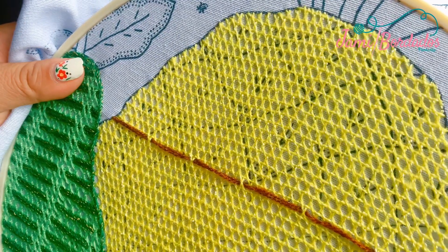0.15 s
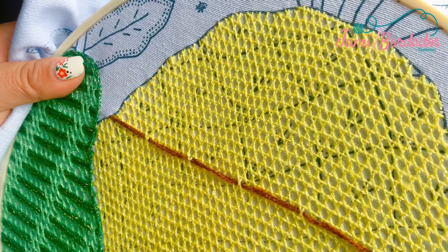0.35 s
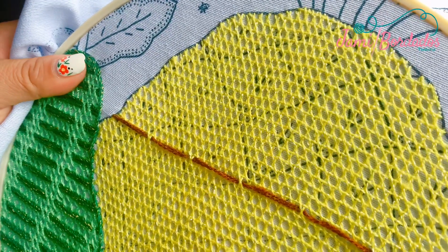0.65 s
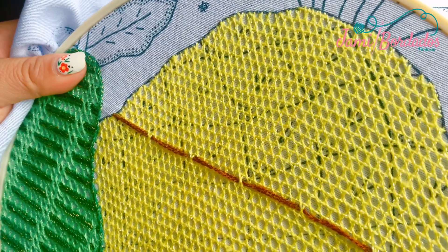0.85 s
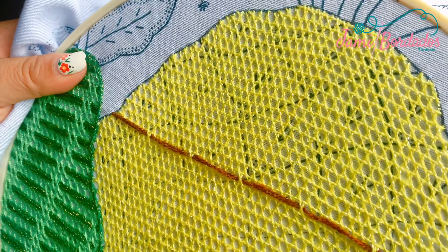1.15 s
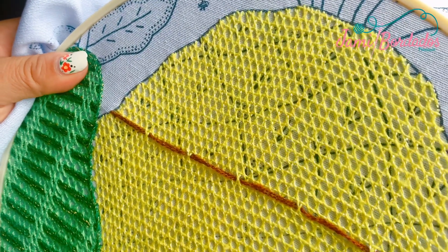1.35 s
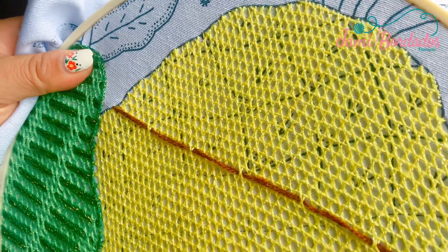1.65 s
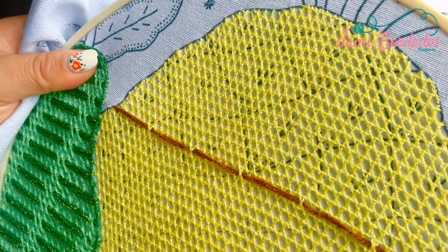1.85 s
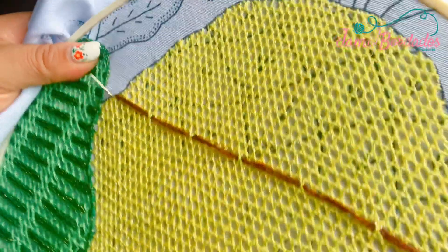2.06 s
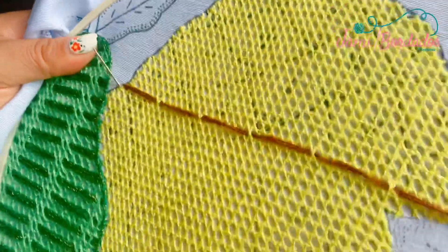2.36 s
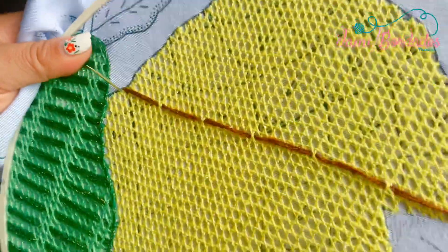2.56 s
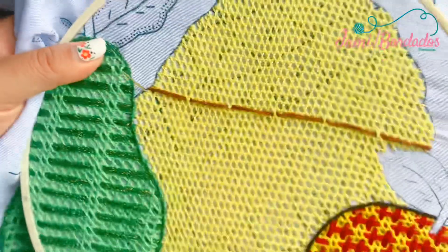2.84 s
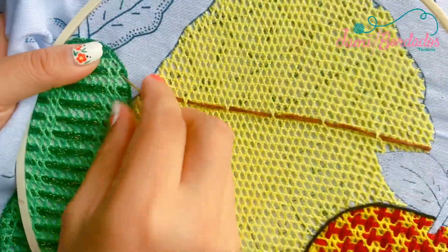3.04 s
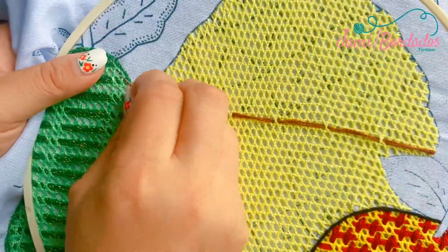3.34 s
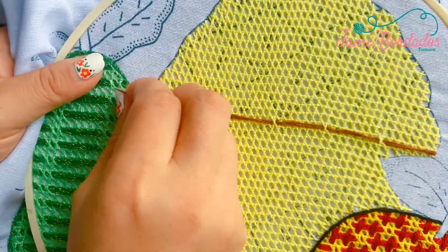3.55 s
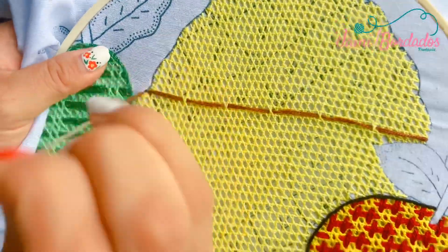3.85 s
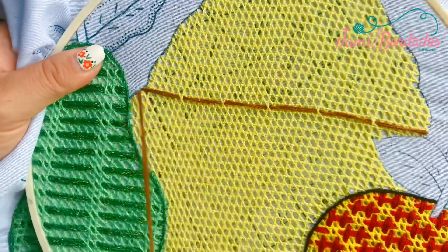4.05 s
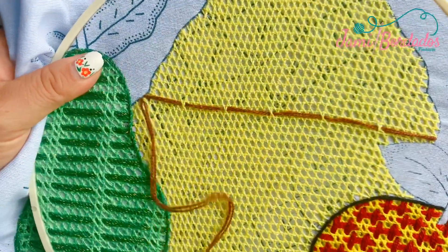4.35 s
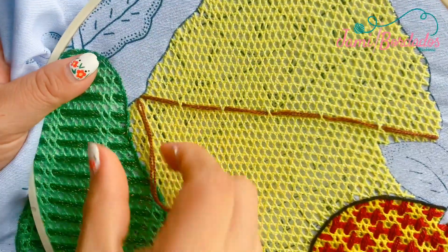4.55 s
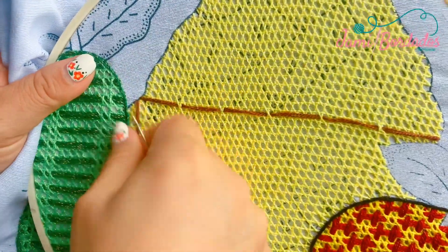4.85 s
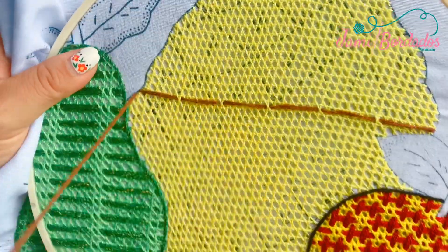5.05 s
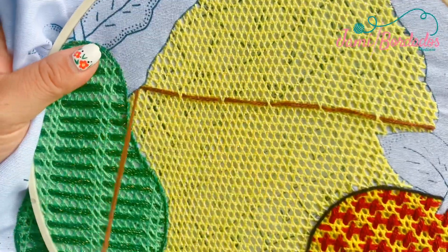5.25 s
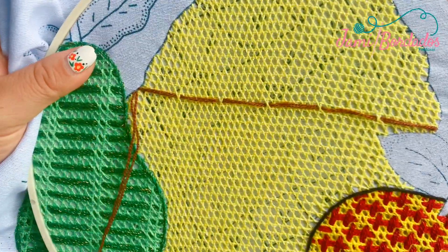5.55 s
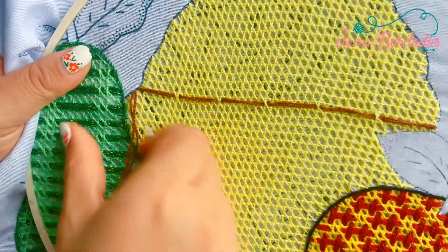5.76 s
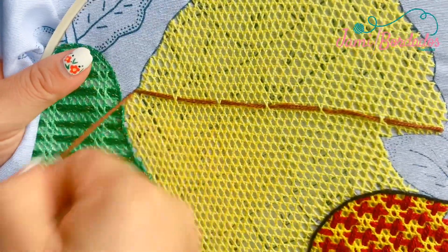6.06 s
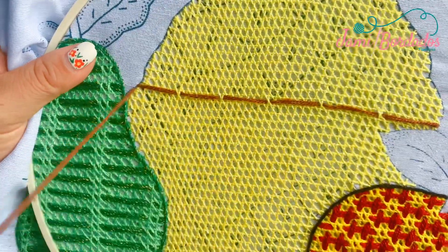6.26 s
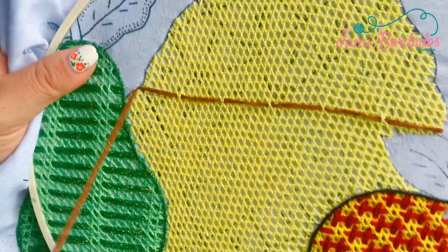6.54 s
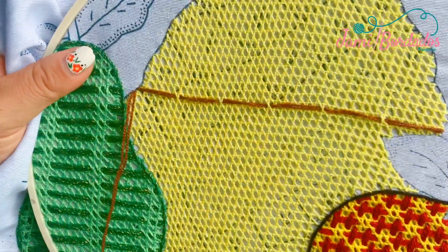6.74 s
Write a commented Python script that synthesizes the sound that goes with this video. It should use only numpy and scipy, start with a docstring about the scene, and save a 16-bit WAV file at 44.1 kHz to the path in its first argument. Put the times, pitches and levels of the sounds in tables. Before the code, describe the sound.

Close up indoors, hand embroidery: light taps, a short creak, brushing fingers, a sharp pop and rasping thread pulls above a low hum.

```python
"""Indoors, close to a two-port microphone, cloth stretched in a hoop is embroidered by hand over a motor's low
hum. The needle clicks, creaks through the weave, is gripped amid brushing fingers and pops free; then the
thread is drawn through in three rasping pulls, the last in two parts. Random impulses and noise model the
friction, and short blows the taps; they excite the resonances of cloth, thread and needle. Damped sines sway
the hoop, and steady sines over shaped noise make the hum and the rumble of the room."""
import sys
import numpy as np
from scipy import signal
from scipy.fft import rfft, irfft
from scipy.io import wavfile

SR = 44100
rng = np.random.default_rng(int(sys.argv[2]) if len(sys.argv) > 2 else 0)


def store_wav(level_fs):
    """Save 16-bit WAV to argv[1]."""
    pcm = np.round(np.clip(np.atleast_2d(level_fs), -1, 1) * 32767)
    wavfile.write(sys.argv[1], SR, pcm.T.astype(np.int16))


N = 304290
TIME = np.arange(N) / SR  # s
BINS = np.fft.rfftfreq(4096, 1 / SR)  # Hz

# Levels in the tables are relative: mixing gains, filters and the two ports act on them afterwards.

# Resonances of the stretched cloth. Each row: frequency in Hz, width in Hz, level in dB.
CLOTH_MODES = [(170, 23.6, 5), (298.4, 27, 6), (412.5, 70, 1.5), (670, 74, 1), (801, 62, -2),
               (957, 130, -1), (1206, 257, -2.5), (1563, 95, -5), (1836, 300, -8), (3125, 110, -9.5),
               (4600, 1000, -14)]
# Pulls of the thread. Each row: start in seconds, fastest moment in seconds, end in seconds,
# rasp of the cloth in dB, hiss of the fibres in dB, shaking of the hoop in dB,
# loss of speed at both ends in dB, rate of taking up in dB/s, rate of going slack in dB/s.
THREAD_PULLS = [(3.746, 4.082, 4.168, -31.5, -50.5, -44, 15.5, 238, 900),
                (4.915, 5.137, 5.264, -29.5, -50, -38.5, 8, 237.5, 476),
                (6.035, 6.075, 6.24, -41, -55.5, -37, 4.5, 177, 400),
                (6.276, 6.436, 6.474, -39.5, -55, -38, 2.5, 239, 2000)]
# Spectrum of the thread's hiss. Each row: frequency in Hz, density in dB per Hz.
THREAD_HISS_SPECTRUM = [(1500, 8), (3000, -4.5), (4000, 1.5), (5500, 8), (7300, 3.5), (8700, 4), (9350, 8),
                        (10000, 7), (11500, 1), (13500, -2.5), (16000, -2)]
# Resonances of the thread in its hole. Each row: mean frequency in Hz, width in Hz, level in dB.
THREAD_MODES = [(778, 160, -1.5), (1400, 310, 1.5), (1800, 390, -9), (3150, 310, -11)]
# Response of the hoop to the plucking thread. Each row: frequency in Hz, gain in dB.
HOOP_RESPONSE = [(40, -11.5), (80, -6.5), (115, 2), (165, 0.5), (230, -9.5), (320, -5.5), (430, -18),
                 (560, -15.5), (1200, -39)]
# Plucks and taps on the cloth. Each row: time in seconds, peak in dB, centre of the blow in Hz,
# decay time of the scrape in seconds.
CLOTH_TAPS = [(1.396, -52.5, 1300, .002), (1.509, -51.5, 1200, 0.004), (1.784, -50, 1600, 0.011),
              (1.9383, -40, 1700, 0.0019), (1.942, -33, 1600, 0.0028), (1.977, -23, 1860, 0.0012),
              (1.981, -29, 1400, 0.003), (2.001, -35.5, 1700, 0.003), (2.0795, -34, 1400, 0.00083),
              (2.15, -58, 1800, .002), (2.274, -29, 328, 0.0092), (2.435, -36.5, 1420, 0.0095),
              (2.48, -41, 1400, 0.0062), (2.548, -44, 900, .004), (2.594, -48, 1200, 0.0022),
              (2.635, -62, 1300, 0.0035), (2.7313, -28, 425, 0.0083), (2.745, -34, 312, 0.0091),
              (2.752, -40, 1000, .003), (2.829, -47, 1300, .002), (2.886, -40.5, 1500, 0.0024),
              (2.894, -39, 1500, 0.0029), (2.914, -42, 1400, 0.0028), (2.939, -40, 1300, 0.036),
              (2.973, -45, 1300, 0.0077), (3.019, -40, 1670, 0.019), (3.0874, -41, 1500, 0.0022),
              (3.621, -21, 1500, 0.00085), (3.65, -31, 1300, 0.0015), (3.708, -28.5, 700, 0.0027),
              (3.728, -20, 480, 0.0089), (3.7305, -9.5, 1330, 0.0028), (3.87, -28.5, 1100, .002),
              (3.9803, -19.5, 2100, 0.0027), (3.9925, -21, 1610, 0.00088), (4.0325, -25, 1400, .001),
              (4.056, -21.5, 1400, 0.0044), (4.071, -32, 920, 0.0041), (4.085, -21, 1100, 0.0019),
              (4.108, -23, 1000, 0.00091), (4.837, -40, 800, .005), (4.908, -27.5, 1200, .002),
              (4.938, -23, 784, 0.0072), (4.982, -28, 1290, .001), (5.173, -18.5, 1900, 0.001),
              (5.182, -15.5, 1260, 0.0018), (5.219, -20, 1600, 0.00083), (5.227, -20.5, 1700, .001),
              (5.273, -31, 1400, 0.00097), (5.303, -29, 1100, .001), (5.487, -36, 1500, 0.0054),
              (5.495, -42.5, 750, 0.013), (5.537, -49, 1400, 0.0048), (5.804, -47, 1300, 0.0048),
              (6.016, -28.5, 990, .002), (6.049, -30.5, 897, 0.011), (6.121, -25.5, 2000, 0.0017),
              (6.18, -28, 875, 0.0013), (6.207, -26.5, 900, 0.0017), (6.277, -23, 1300, 0.001),
              (6.29, -28, 1500, 0.0018), (6.337, -37, 1600, .001), (6.363, -34, 1300, 0.001),
              (6.369, -28, 1700, .001), (6.408, -27, 900, .001), (6.438, -28, 1010, 0.0008),
              (6.456, -24.5, 1600, .001), (6.802, -50.5, 2530, 0.0036)]
# Slips of the needle in the weave. Each row: time in seconds, mean slips per second, force in dB.
CREAK_CURVE = [(2.2136, 190, -6.5), (2.229, 247, -4.5), (2.252, 256, -2.5), (2.262, 212, -4),
               (2.267, 140, -2.5), (2.277, 123, -5)]
# Resonances of the sinking needle. Each row: first frequency in Hz, last frequency in Hz, width in Hz,
# level in dB.
SHAFT_MODES = [(775, 678, 30, -5.5), (1076, 700, 69, -1.5), (1800, 2030, 180, -13.5),
               (3080, 3300, 200, -22.5), (4100, 4400, 460, -19)]
# Tiny dry clicks. Each row: time in seconds, peak in dB, centre in Hz, ring of the cloth in dB.
NEEDLE_CLICKS = [(0.329, -46, 14000, 21), (0.3357, -43, 14500, 20), (.343, -32.5, 14300, 18),
                 (0.6152, -30.5, 7200, -8.5), (1.6508, -35, 14000, 22.5), (3.6214, -31, 6850, -20),
                 (5.3033, -28, 9000, 17)]
# Fingertips brushing the stitches. Each row: start in seconds, length in seconds, level in dB,
# mean pitch of the hollow in Hz, ring of the hollow in dB.
FINGER_BRUSHES = [(2.749, 0.021, -41.5, 800, -12), (3.156, 0.0099, -52, 970, -4),
                  (3.165, 0.044, -54, 1000, 7), (3.212, 0.043, -47, 1010, -2.5),
                  (3.258, 0.023, -42.5, 965, -3), (3.404, 0.0077, -42, 940, 0.5),
                  (3.489, 0.0087, -38, 950, -13), (3.546, 0.06, -52.5, 990, 1.5)]
# Spectrum of the brushing skin. Each row: frequency in Hz, density in dB per Hz.
BRUSH_SPECTRUM = [(400, 4), (780, 2), (1300, 5.5), (1500, 8.5), (1850, 2.5), (2300, 3), (3600, 5),
                  (4300, 8.5), (5500, 3.5), (8000, 3), (11000, -7), (16000, -9.5)]
# Rubs of needle and fingers. Each row: start in seconds, length in seconds, rasp in dB, hiss in dB.
CLOTH_RUBS = [(0.332, 0.018, -56.5, -80.5), (0.604, 0.032, -59.5, -75.5), (1.653, 0.02, -51.5, -80),
              (1.911, 0.015, -43.5, -63.5), (1.976, 0.335, -51.5, -65), (2.42, 0.015, -63, -53.5),
              (2.485, 0.011, -50, -47.5), (2.557, 0.02, -48, -54), (2.598, 0.029, -57.5, -54.5),
              (2.646, 0.03, -70, -49.5), (2.737, 0.071, -44, -61), (2.876, 0.017, -45, -73),
              (2.918, 0.087, -53, -86), (3.01, 0.15, -57.5, -75), (3.628, 0.064, -37.5, -54),
              (4.196, 0.052, -54.5, -91), (4.565, 0.202, -59.5, -67.5), (4.916, 0.028, -34, -59),
              (5.703, 0.078, -58.5, -63.5), (5.84, 0.045, -63, -62), (6.045, 0.016, -35, -66)]
# Spectrum of the sliding skin's hiss. Each row: frequency in Hz, density in dB per Hz.
SKIN_HISS_SPECTRUM = [(1500, -1), (3000, -2), (5000, -5.5), (7200, 2), (10000, -5.5), (13000, -15),
                      (16000, -3.5)]
# Resonances of the rubbed stitches. Each row: mean frequency in Hz, width in Hz, level in dB.
STITCH_MODES = [(766, 180, 0), (1044, 180, 0.5), (1500, 240, -2.5), (2100, 280, -6.5), (3360, 270, -13)]
# Shoves on the hoop. Each row: time in seconds, peak in dB, centre of the shove in Hz.
HOOP_SHOVES = [(1.935, -25, 113), (2.276, -21, 107.5), (2.449, -27, 38), (2.735, -26.5, 180),
               (2.755, -25, 72), (3.623, -27.5, 138), (3.709, -27.5, 188), (3.728, -17.5, 174),
               (3.741, -30, 40), (5.169, -23.5, 143)]
# Swinging modes of the hoop. Each row: frequency in Hz, level in dB, 60 dB decay time in seconds.
HOOP_MODES = [(43.3, -3, 0.48), (72, 7, 0.17), (122, 1.5, 0.082), (189, 2.5, 0.059), (239, -2.5, 0.093)]
# Partials of the motor; the tone just above the main one makes it throb.
# Each row: multiple of the hum frequency, level in dB.
HUM_PARTIALS = [(1, -1), (1.242, -20.5), (2, -27.5), (3, -30.5)]
# Spectrum of the room's rumble. Each row: frequency in Hz, density in dB per Hz.
ROOM_SPECTRUM = [(20, -17.5), (45, -6), (78, 3.5), (98, -3), (150, -7.5), (230, -8), (330, -19.5),
                 (520, -36.5), (780, -38), (1100, -44), (1400, -45.5), (1720, -39), (2200, -48.5),
                 (4500, -46.5), (16000, -52)]
# Phase between the ports. Each row: frequency in Hz, lead of the left port in radians.
PORT_LEAD = [(20, 0), (1900, 0), (2900, 1.4), (4300, 2), (5400, 3.1), (7700, 6), (9100, 6.5), (11500, 9),
             (13300, 9.8), (15000, 12.4)]
# Level between the ports. Each row: frequency in Hz, left minus right in dB.
PORT_DIFFERENCE = [(60, -1), (100, -4), (200, -5.5), (500, -7), (770, -6), (1200, 3.5), (1900, -4.5),
                   (2800, -5), (4200, -2), (6000, 0.5), (15000, 0)]

HISS_FOLLOWS = 0.65  # dB of hiss for each dB of rasp as the speed changes
SETTLE_DB, SETTLE_DB_PER_S = -17, 190  # the slack thread slides on faintly after a pull
SURGES_PER_S, SURGE_DB = 28, 1.37  # the hand pulls unevenly
SNAGS_PER_S, SNAGS_DB = 77, -12.5  # thicker spots of the thread catch in the hole
TWISTS_PER_S, TWIST_SHARE = 220, 1.1  # typical rate of plies flicking over the rim; their gain
THREAD_RING_DB = -6.5
BRUSH_RISE_S, BRUSH_FALL_S = 0.0074, 0.005
BRUSH_TAIL_DB, BRUSH_TAIL_S = -12.5, 0.031  # the finger lingers
HOLLOW_WIDTH_HZ = 290  # of each of two resonances in series
SLIDE_RISE_DB_PER_S, SLIDE_FALL_DB_PER_S = 499, 331.5
HUM_HZ, HUM_DB, HUM_FADE_DB_PER_S, HUM_WAVER_DB = 58.75, -28, 1.37, 0.45
HUM_DIP_S, HUM_DIP_WIDTH_S, HUM_DIP_DB = 4.28, 0.07, -11  # the hum dips briefly
BEAT_S, BEAT_WIDTH_S, BEAT_HZ, BEAT_DB = 4.66, 0.14, 77, -41  # a second low tone swells briefly
LAG_HZ, LAG_WIDTH_HZ = 700, 900
EDGE_HZ = 15900


def pulls(rasp, hiss, shake):
    """Friction: twisted thread plucks its hole in clumps, ringing cloth and hoop, while its fibres hiss."""
    clumps = flutter(per_s=200, depth_db=3.2)
    surges = flutter(per_s=SURGES_PER_S, depth_db=SURGE_DB)
    snags = amp(SNAGS_DB) * slips(per_s=SNAGS_PER_S, spread_db=-2.0)
    grain = evened(clumps * (slips(per_s=1400, spread_db=1.2) + 0.35 * rng.standard_normal(N)))
    plucks = evened(evened(surges * (grain + TWIST_SHARE * twists())) + snags)

    body = evened(colour(plucks, cloth()))
    thread = wandering_rings(plucks, THREAD_MODES)
    hoop = evened(colour(plucks, amp(read(HOOP_RESPONSE, BINS))))
    friction = slips(per_s=9000, spread_db=4.5) + 0.5 * plucks
    fibres = evened(colour(friction, amp(read(THREAD_HISS_SPECTRUM, BINS))))

    rasping = rasp * (amp(-3.0) * body + amp(THREAD_RING_DB) * thread)
    return rasping + shake * hoop + amp(11.0) * hiss * fibres


def pull_gains():
    """Speed law: the hand speeds up and slows in one arch; rasp and hiss follow, the hoop's shaking does not."""
    gains = np.zeros((3, N))
    for start, fastest, end, rasp_db, hiss_db, hoop_db, slow_db, rise, fall in THREAD_PULLS:
        speed_db = -slow_db * np.interp(TIME, [start, fastest, end], [1, 0, 1]) ** 1.65
        settling = amp(SETTLE_DB) * contact(start, end, rise, SETTLE_DB_PER_S)
        taut = np.maximum(contact(start, end, rise, fall), settling)
        gains[0] += taut * amp(rasp_db + speed_db)
        gains[1] += taut * amp(hiss_db + HISS_FOLLOWS * speed_db)
        gains[2] += taut * amp(hoop_db)
    return gains


def twists():
    """Periodic excitation: the plies flick over the rim in turn, unevenly spaced and unevenly strong."""
    rate = TWISTS_PER_S * flutter(per_s=250, depth_db=3) * flutter(per_s=14, depth_db=2)
    turns = np.cumsum(rate) / SR
    flicks = np.diff(np.floor(turns), prepend=0)
    return evened(flicks * flutter(per_s=400, depth_db=4))


def fuzz(thread, skin):
    """Incoherent friction: loose fibres rub along thread and hand, a wide hiss unrelated at the two ports."""
    return amp(-3.5) * np.array([thread * noise(THREAD_HISS_SPECTRUM) + skin * noise(SKIN_HISS_SPECTRUM)
                                 for port in "LR"])


def taps():
    """Impact: a push and a brief scrape excite the cloth; the centre of each blow sets how bright it is."""
    out, t = np.zeros(N), np.arange(4096) / SR
    for s, db, hz, length in CLOTH_TAPS:
        scrape = rng.standard_normal(len(t)) * np.exp(-t / length) * (1 - np.exp(-t / 0.0001))
        padding = 1 / np.hypot(1, BINS / hz)  # the soft weave takes the edge off
        ring = colour((t == 0) + 0.11 * scrape, cloth() * bell(hz, 1.43 * hz) * padding)
        add(out, s, amp(db) * ring / abs(ring).max())
    return out


def creak():
    """Stick-slip: the shaft jerks through the weave in a quick run that slows at last, ringing cloth and needle."""
    s, per_s, force_db = np.transpose(CREAK_CURVE)
    t = np.arange(s[0], s[-1], 1 / SR)
    unsteady = flutter(per_s=200, depth_db=0.8)[:len(t)]
    turns = np.cumsum(np.interp(t, s, per_s) * unsteady) / SR
    jerks = np.diff(np.floor(turns), prepend=-1)
    grit = 0.085 * np.exp(-(turns % 1) / 0.25) * rng.standard_normal(len(t))  # dies away after each jerk
    force = np.zeros(N)
    add(force, s[0], (jerks + grit) * amp(np.interp(t, s, force_db) + rng.standard_normal(len(t))))

    # Response at the contact. Each row: frequency in Hz, gain in dB.
    response = [(60, 1), (175, 6), (245, 10.5), (340, -5), (430, 4.5), (680, -3.5), (1200, -8.5),
                (2500, -9.0), (5000, -20), (9000, -13), (14000, -13)]
    shaft = np.zeros(N)
    for first, last, width, db in SHAFT_MODES:
        pitch = np.interp(TIME, s[[0, -1]], [first, last])
        shaft += amp(db) * resonate(force, pitch, width)
    return amp(10.5) * colour(force, cloth() * amp(read(response, BINS))) - amp(8.5) * shaft


def clicks():
    """Hard impact: two wide resonances of the needle and a trace of the cloth's ring make bright little clicks."""
    out, t = np.zeros(N), np.arange(4096) / SR
    for s, db, hz, ring_db in NEEDLE_CLICKS:
        decay = np.exp(-t / 0.0008) + 0.04 * np.exp(-t / 0.015)
        blow = (t == 0) + 0.25 * rng.standard_normal(len(t)) * decay
        needle = bell(hz, 0.25 * hz) + amp(2.5) * bell(0.66 * hz, 0.12 * hz)
        needle = needle / np.hypot(1, (BINS / (0.92 * hz)) ** 3)  # falls steeply above the centre
        tick = colour(blow, needle + amp(ring_db) * cloth() * bell(hz=1600, width=2100))
        add(out, s, amp(db) * tick / abs(tick).max())
    return out


def brushes():
    """Cavity resonance: skin swishes over stitches; the hollow under the fingers shifts pitch with the grip."""
    touch, hollow = np.zeros((2, N))
    for s, length, db, hz, hollow_db in FINGER_BRUSHES:
        after = np.maximum(TIME - s - length, 0)
        lingering = amp(BRUSH_TAIL_DB) * np.exp(-after / BRUSH_TAIL_S)
        release = np.maximum(np.exp(-after / BRUSH_FALL_S), lingering)
        stroke = amp(db) * np.clip((TIME - s) / BRUSH_RISE_S, 0, 1) * release
        touch += stroke
        hollow += amp(hollow_db) * stroke
    s, length, _, hz, _ = np.transpose(FINGER_BRUSHES)
    pitch = np.interp(TIME, s + length / 2, hz) * flutter(per_s=140, depth_db=0.35)
    grains = slips(per_s=6000, spread_db=4.0)
    ring = resonate(resonate(hollow * grains, pitch, HOLLOW_WIDTH_HZ), pitch, HOLLOW_WIDTH_HZ)
    swish = colour(touch * grains, evened(amp(read(BRUSH_SPECTRUM, BINS))))
    return amp(-2) * swish + amp(16.0) * ring


def slides(rasp, hiss):
    """Light sliding friction: uneven rubs catch the weave and ring a few stitches, over a soft hiss."""
    rubs = evened(flutter(per_s=90, depth_db=2.8) * flutter(per_s=35, depth_db=2.5))
    catches = rubs * (slips(per_s=700, spread_db=1.2) + 0.35 * rng.standard_normal(N))
    weave = evened(colour(catches, cloth() * bell(hz=1200, width=5000)))
    body = evened(weave + wandering_rings(catches, STITCH_MODES))
    friction = np.sqrt(rubs) * slips(per_s=6100, spread_db=2.5)
    skin = evened(colour(friction, amp(read(SKIN_HISS_SPECTRUM, BINS))))
    return amp(-7.5) * rasp * body + amp(-0.5) * hiss * skin


def slide_gains():
    """Contact envelopes: rasp and hiss gains of the rubs, which all swell and fade at the same rates."""
    gains = np.zeros((2, N))
    for s, length, rasp_db, hiss_db in CLOTH_RUBS:
        touch = contact(s, s + length, SLIDE_RISE_DB_PER_S, SLIDE_FALL_DB_PER_S)
        gains += amp([[rasp_db], [hiss_db]]) * touch
    return gains


def holding():
    """Random excitation: held cloth stirs faintly all the time under the thumb, in shifting registers."""
    stirring = np.zeros(N)
    for hz in (600, 850, 1450, 1750):
        stirring += flutter(per_s=22, depth_db=6) * colour(rng.standard_normal(N), bell(hz, 250))
    return amp(-74) * evened(colour(stirring, cloth()))


def sways():
    """Damped oscillation: a shove swings the whole hoop, stirring most the modes near its centre."""
    out, t = np.zeros(N), np.arange(SR // 2) / SR
    for s, db, centre_hz in HOOP_SHOVES:
        shove = bell(centre_hz, 0.78 * centre_hz) ** 2
        swing = np.zeros(len(t))
        for hz, mode_db, t60 in HOOP_MODES:
            decay = np.exp(-np.log(1000) * t / t60)
            swing += amp(mode_db) * np.interp(hz, BINS, shove) * np.sin(2 * np.pi * hz * t) * decay
        swing *= 1 - np.exp(-t / 0.003)  # soft onset
        add(out, s, amp(db) * swing / abs(swing).max())
    return out


def hum():
    """Beating partials: a motor hums low, wavering and slowly growing fainter, over the rumble of the room."""
    dip_db = HUM_DIP_DB * np.exp(-((TIME - HUM_DIP_S) / HUM_DIP_WIDTH_S) ** 2)
    level = amp(HUM_DB - HUM_FADE_DB_PER_S * TIME + dip_db) * flutter(per_s=10, depth_db=HUM_WAVER_DB)
    tone = sum(amp(db) * np.sin(2 * np.pi * (k * HUM_HZ * TIME + rng.random())) for k, db in HUM_PARTIALS)
    swell = np.exp(-((TIME - BEAT_S) / BEAT_WIDTH_S) ** 2)
    beat = amp(BEAT_DB) * swell * np.sin(2 * np.pi * BEAT_HZ * TIME)
    rumble = amp(-49.5) * noise(ROOM_SPECTRUM) * flutter(per_s=12, depth_db=2.73)
    return np.sqrt(2) * (level * tone + beat) + rumble


def disperse(x):
    """Dispersion: an all-pass delays some waves more than others, rounding blows off by about a millisecond."""
    r = np.exp(-np.pi * LAG_WIDTH_HZ / SR)
    poles = np.array([1, -2 * r * np.cos(2 * np.pi * LAG_HZ / SR), r * r])
    return signal.lfilter(poles[::-1], poles, x)


def ports(x):
    """Interaural-like cues: the two ports hear the same sound with different phase and colour."""
    hz = np.fft.rfftfreq(N, 1 / SR)
    half = amp(read(PORT_DIFFERENCE, hz) / 2)
    right = np.exp(-1j * read(PORT_LEAD, hz)) / half
    return irfft(rfft(x) * np.array([half, right]), N)


def nearby(x):
    """Scattering: hand, hoop and table return the treble within a few ms, differently to each port."""
    t = np.arange(SR // 50) / SR
    echoes = rng.standard_normal((2, len(t))) * np.exp(-t / 0.005) * (t > 0.0005)
    treble = colour(x, BINS ** 2 / (BINS ** 2 + 2300 ** 2))
    return signal.fftconvolve(treble[None], echoes / np.linalg.norm(echoes[0]), axes=1)[:, :N]


def room(x, t60):
    """Reverberation: a short, soft tail of decaying noise, unrelated at the two ports."""
    t = np.arange(SR // 2) / SR
    tail = rng.standard_normal((2, len(t))) * np.exp(-np.log(1000) * t / t60) * (t > 0.002)
    return signal.fftconvolve(x[None], tail / np.linalg.norm(tail[0]), axes=1)[:, :N]


def cloth():
    """Modal response: the gain of the taut cloth, the powers of all its resonances added."""
    return np.sqrt(sum((amp(db) * bell(hz, width)) ** 2 for hz, width, db in CLOTH_MODES))


def wandering_rings(plucks, rings):
    """Tension and pitch: resonances of stretched threads wander with their tension and come forward at random."""
    out = np.zeros(N)
    for hz, width, db in rings:
        wander = hz * flutter(per_s=25, depth_db=0.7)
        share = flutter(per_s=70, depth_db=3.5)
        out += amp(db) * evened(share * resonate(resonate(plucks, wander, width), wander, width))
    return evened(out)


def resonate(x, hz, width):
    """Swept resonance: shifts the curve hz down to zero, smooths there with a one-pole, and shifts back."""
    turn, r = np.exp(2j * np.pi * np.cumsum(hz) / SR), np.exp(-np.pi * width / SR)
    return 2 * (turn * signal.lfilter([1 - r], [1, -r], x / turn + 1e-18)).real


def bell(hz, width):
    """Simple resonator: its gain over frequency, 1 at the centre."""
    return 1 / np.sqrt(1 + ((BINS ** 2 - hz ** 2) / (width * BINS + 1e-6)) ** 2)


def colour(x, gain):
    """Minimum phase: a causal filter of the given gain rings after a click, never before."""
    log_gain = np.log(np.maximum(np.r_[gain, gain[-2:0:-1]], 1e-5))
    ring = np.fft.ifft(np.exp(np.conj(signal.hilbert(log_gain)))).real
    return signal.oaconvolve(x, ring)[:len(x)]


def slips(per_s, spread_db):
    """Random impulses: fibres let go at chance moments, with sizes spread in decibels."""
    size = amp(spread_db * np.minimum(rng.exponential(1, N), 4))
    return evened(size * rng.choice([-1, 1], N) * (rng.random(N) < per_s / SR))


def noise(points):
    """Spectral shaping: steady noise of a given spectrum, at rms 1."""
    gain = amp(read(points, np.fft.rfftfreq(N, 1 / SR)))
    return evened(irfft(rfft(rng.standard_normal(N)) * gain, N))


def flutter(per_s, depth_db):
    """Random modulation: a gain that wavers between chance values drawn at the given rate."""
    knots = np.arange(0, N / SR + 1, 1 / per_s)
    return amp(depth_db * np.interp(TIME, knots, rng.standard_normal(4096)[:len(knots)]))


def contact(start, end, rise_db_per_s, fall_db_per_s):
    """Exponential envelope: a stroke rises to 1 at its start, holds, and dies away after its end."""
    return amp(-rise_db_per_s * np.maximum(start - TIME, 0) - fall_db_per_s * np.maximum(TIME - end, 0))


def read(points, hz):
    """Logarithmic pitch: reads a table along a log-frequency axis."""
    f, value = np.transpose(points)
    return np.interp(np.log(hz + 1), np.log(f + 1), value)


def amp(db):
    """Decibel law: level to amplitude gain."""
    return 10 ** (np.asarray(db) / 20)


def evened(x):
    """Normalisation: scales to rms 1."""
    return x / np.sqrt(np.mean(x ** 2) + 1e-20)


def add(mix, s, sound):
    """Superposition: mixes a sound in at s seconds."""
    part = mix[round(s * SR):][:len(sound)]
    part += sound[:len(part)]


def scene():
    """Superposition: handwork and hum at the two ports, with near reflections, a little room and even hiss."""
    pull_rasp, pull_hiss, shake = pull_gains()
    slide_rasp, slide_hiss = slide_gains()
    work = pulls(pull_rasp, pull_hiss, shake) + taps() + creak() + clicks() + brushes()
    work += slides(slide_rasp, slide_hiss) + holding()
    work = disperse(work)
    space = amp(-11) * nearby(work) + amp(-18) * room(work, t60=0.2)
    even_hiss = amp(-81.5) * rng.standard_normal((2, N))
    return ports(work + sways() + hum()) + fuzz(pull_hiss, slide_hiss) + space + even_hiss


def record(dry):
    """Band limiting: a steep linear-phase low-pass removes the highest treble."""
    lowpass = signal.firwin(511, EDGE_HZ, window=("kaiser", 9), fs=SR)
    return signal.oaconvolve(dry, lowpass[None], "same")


dry = scene()
out = record(dry)
store_wav(out)
```